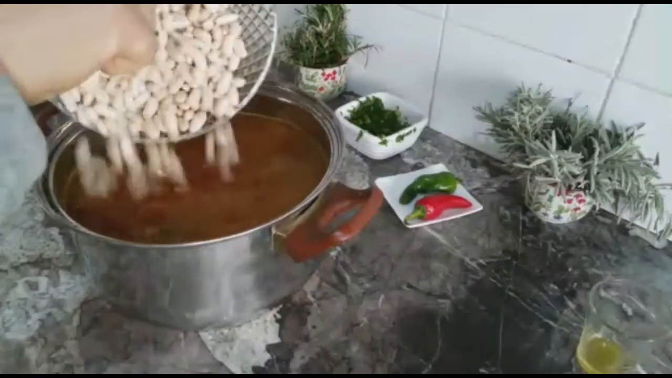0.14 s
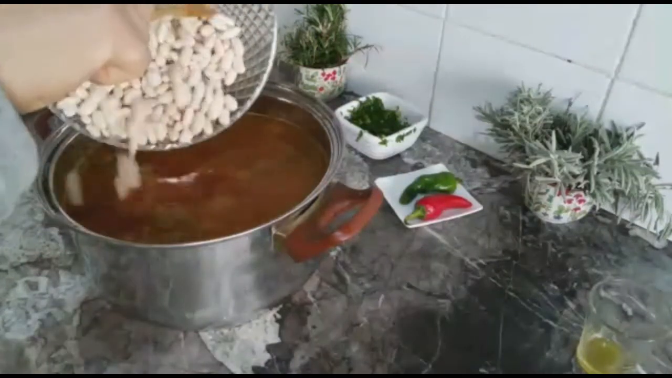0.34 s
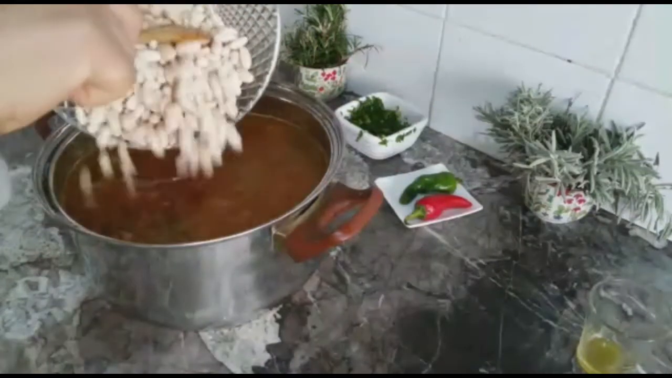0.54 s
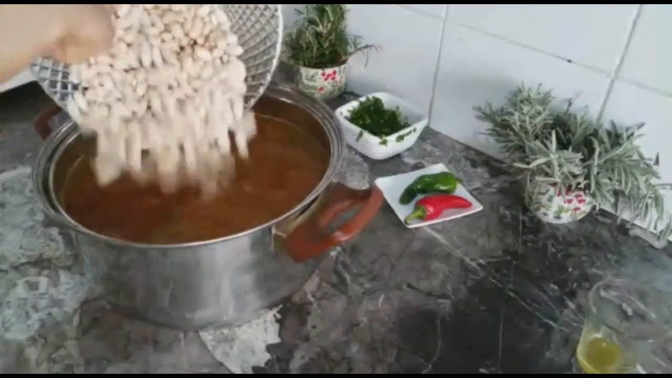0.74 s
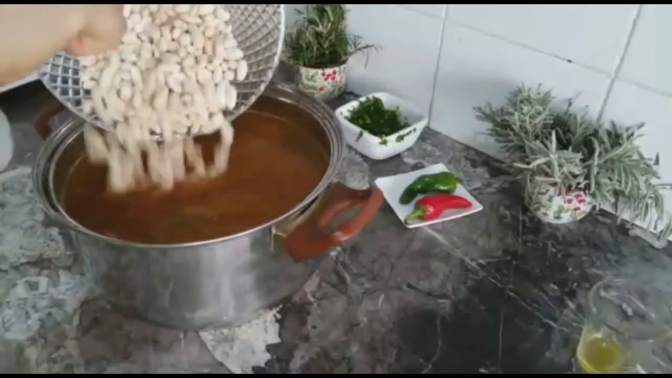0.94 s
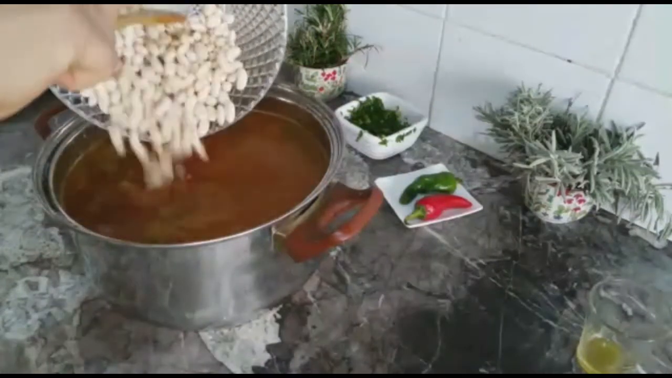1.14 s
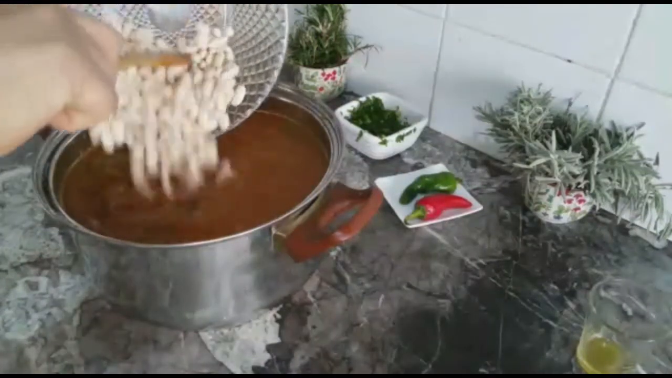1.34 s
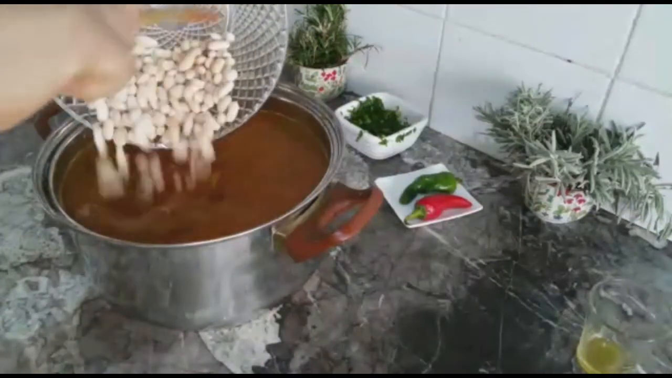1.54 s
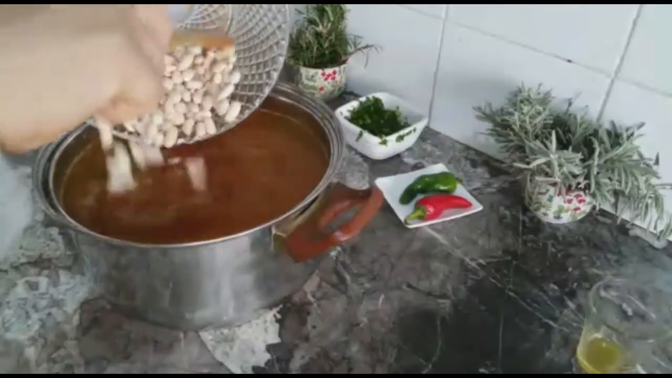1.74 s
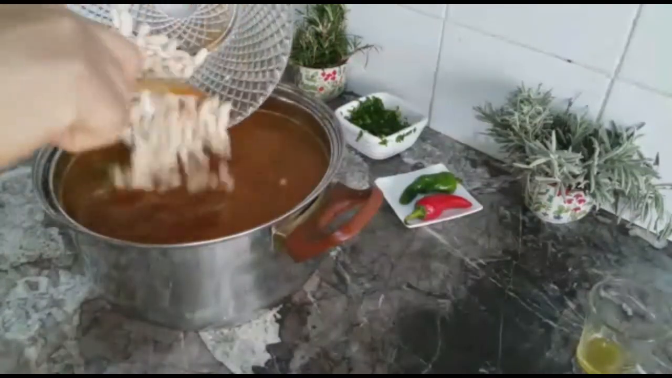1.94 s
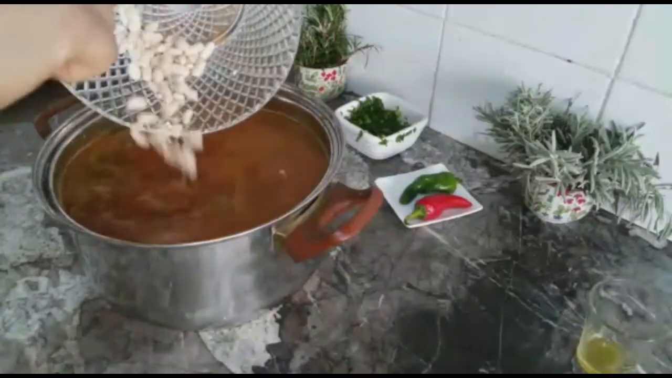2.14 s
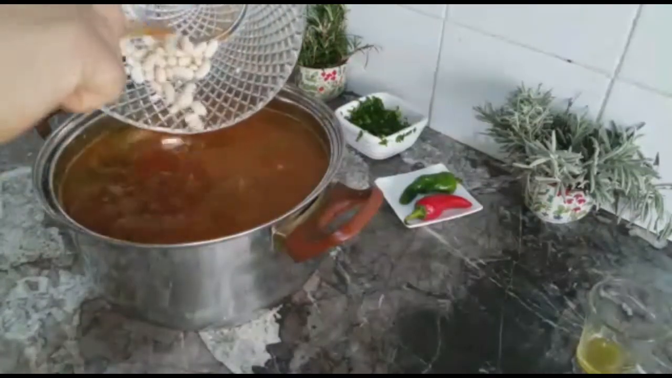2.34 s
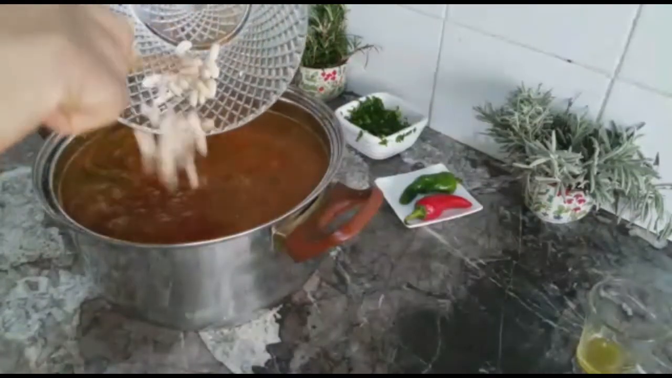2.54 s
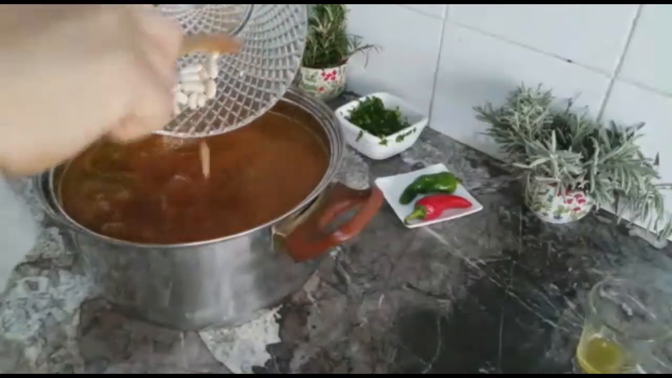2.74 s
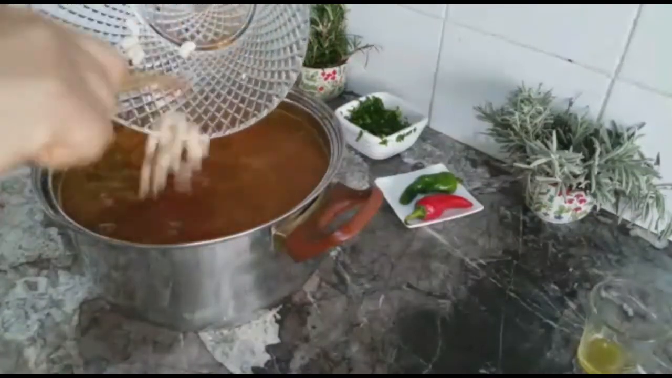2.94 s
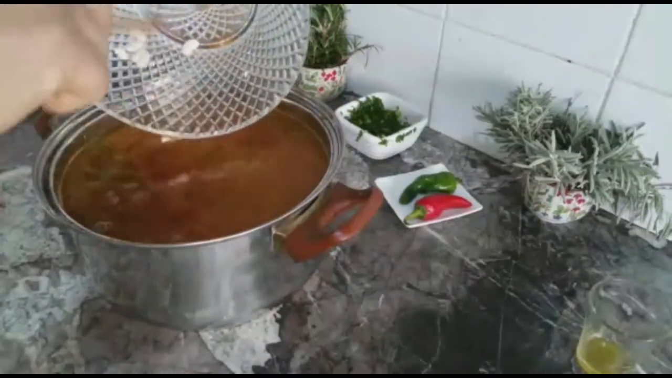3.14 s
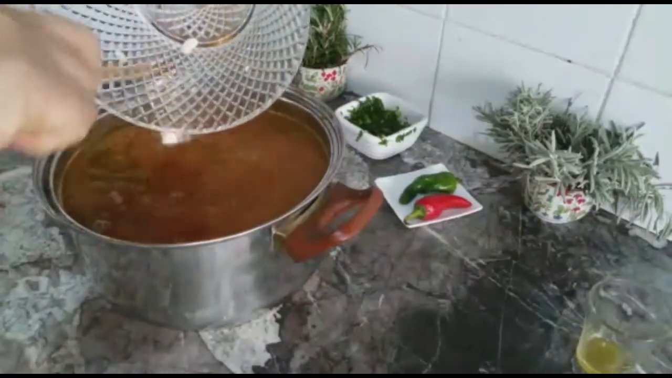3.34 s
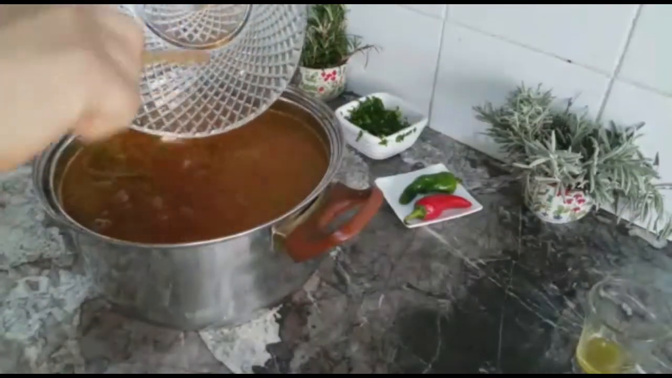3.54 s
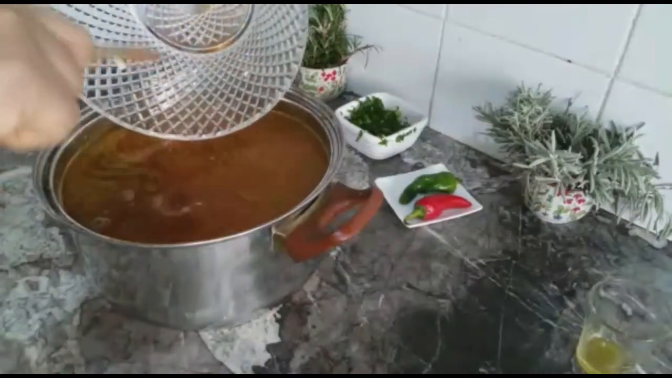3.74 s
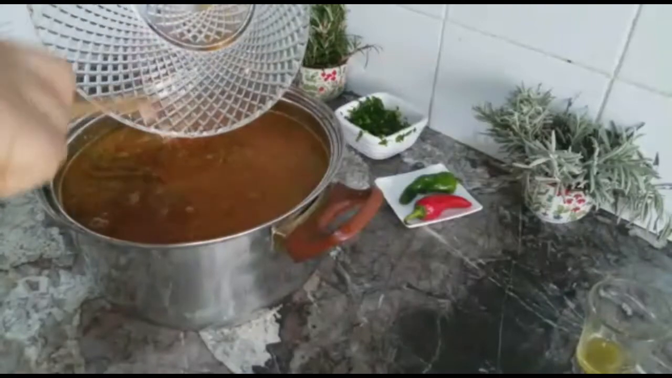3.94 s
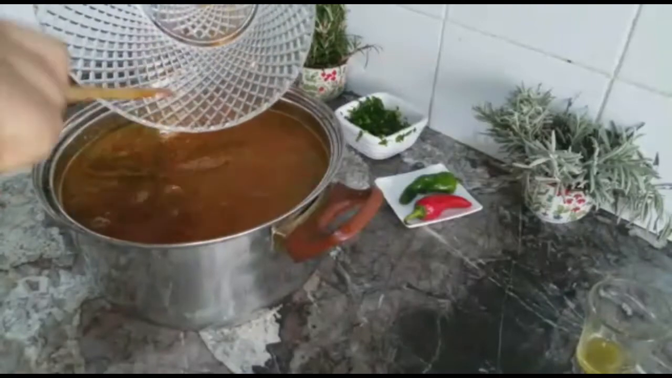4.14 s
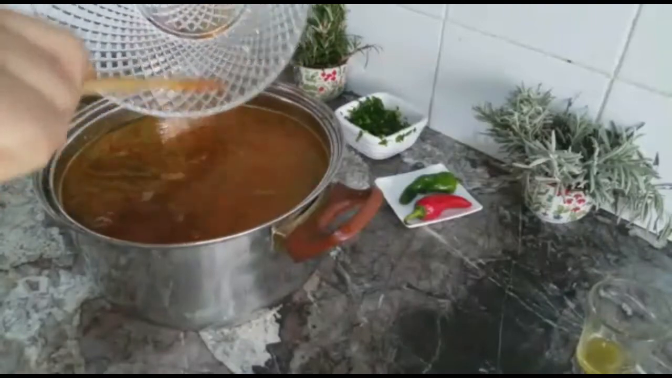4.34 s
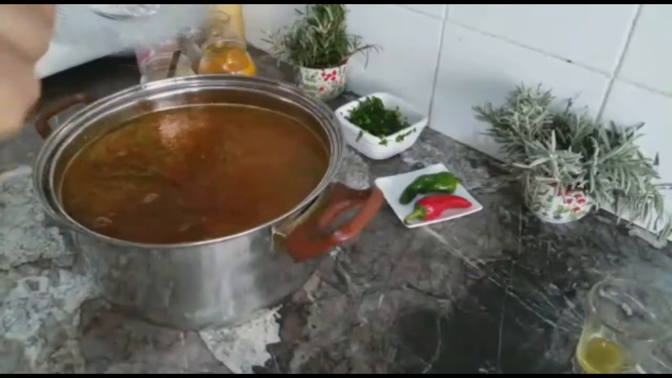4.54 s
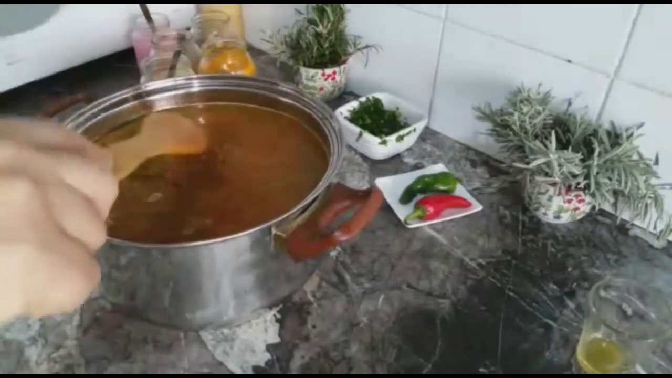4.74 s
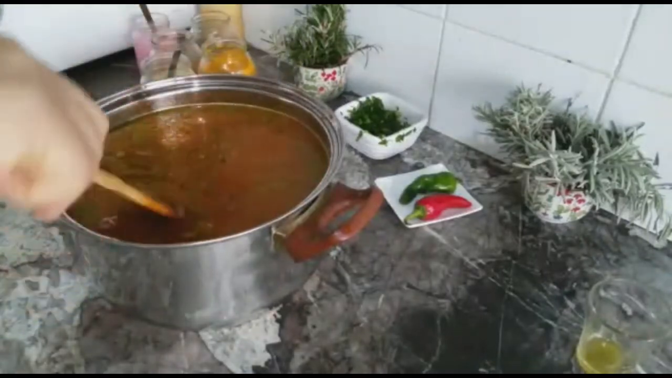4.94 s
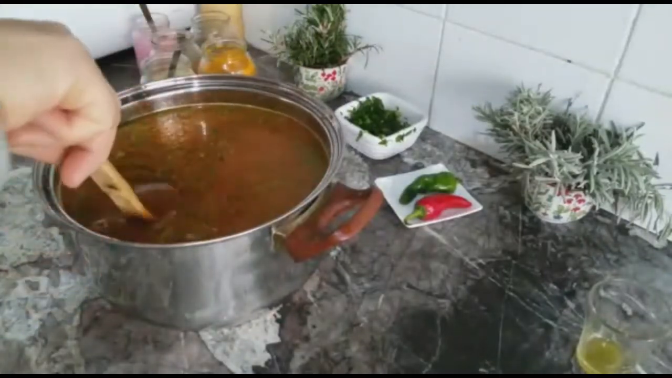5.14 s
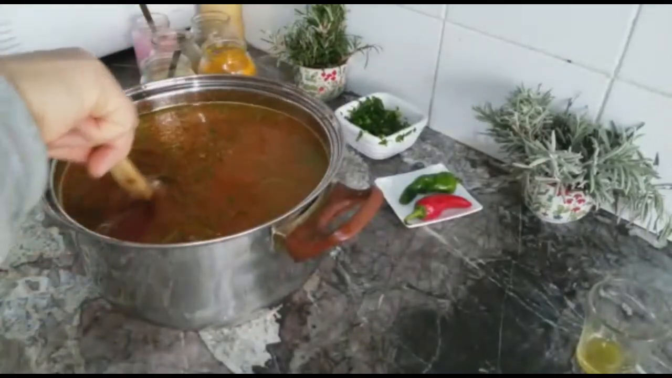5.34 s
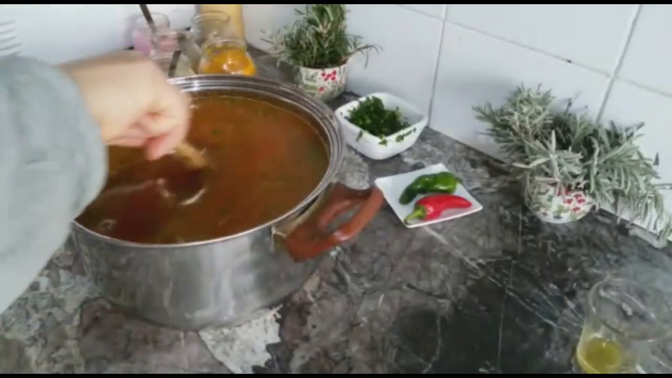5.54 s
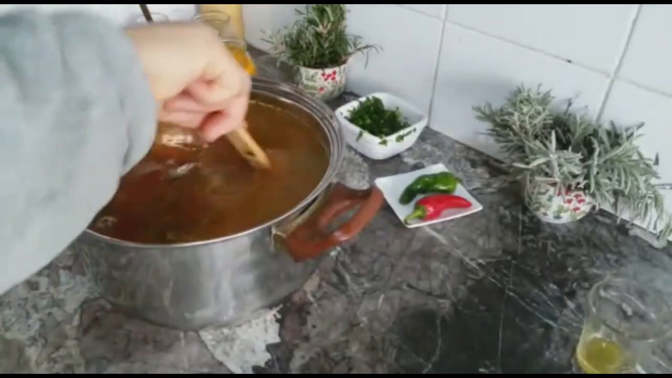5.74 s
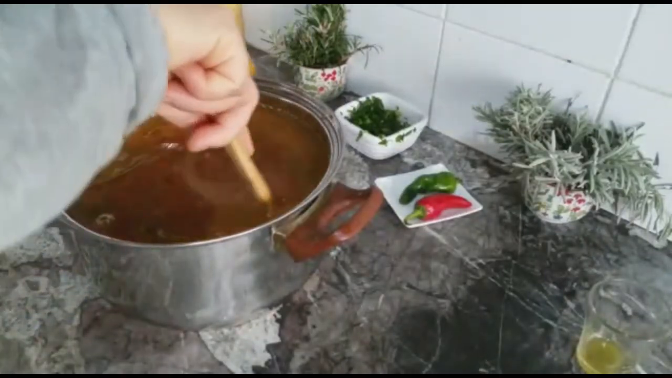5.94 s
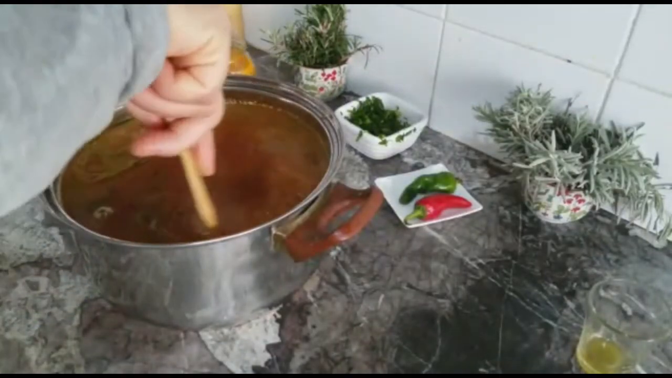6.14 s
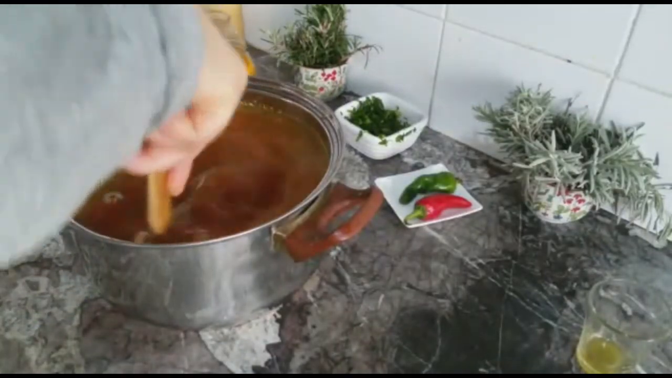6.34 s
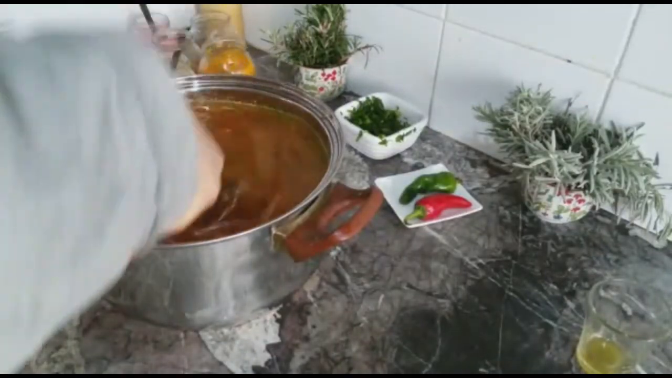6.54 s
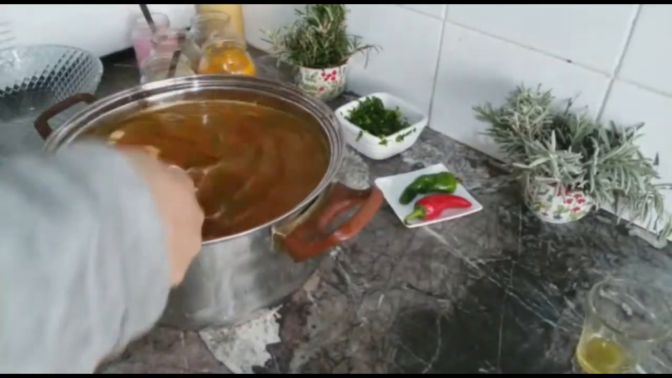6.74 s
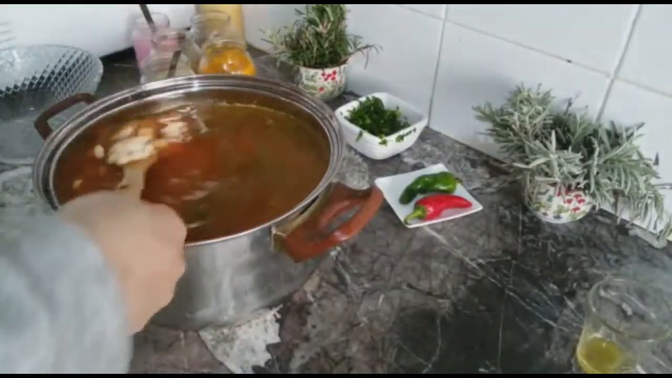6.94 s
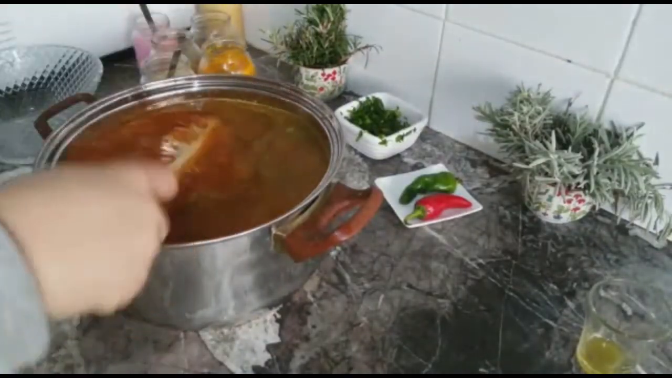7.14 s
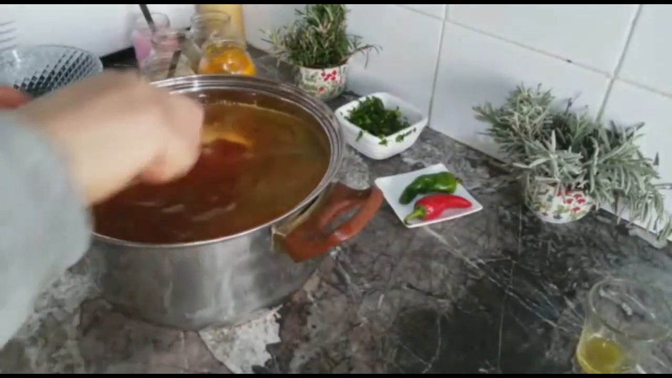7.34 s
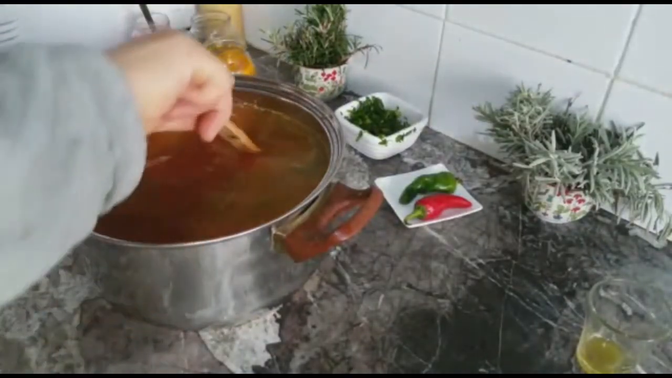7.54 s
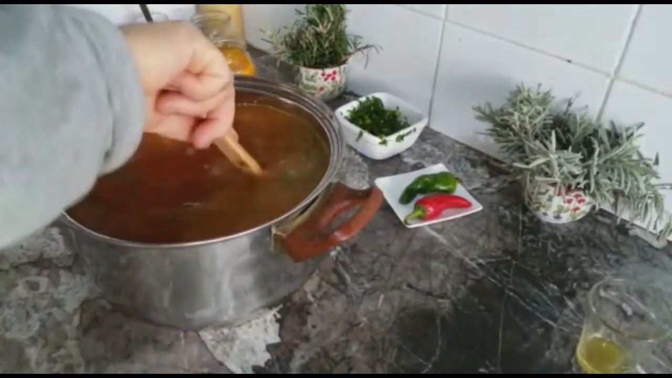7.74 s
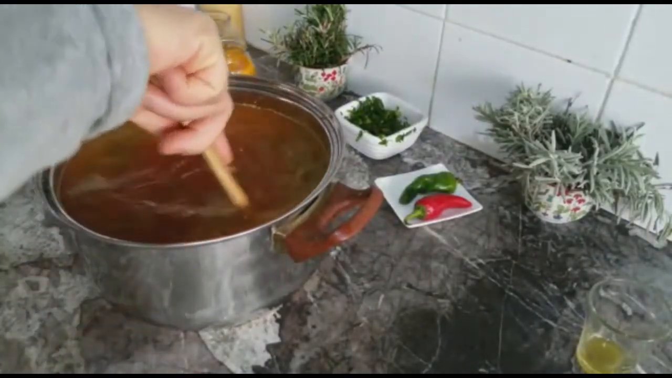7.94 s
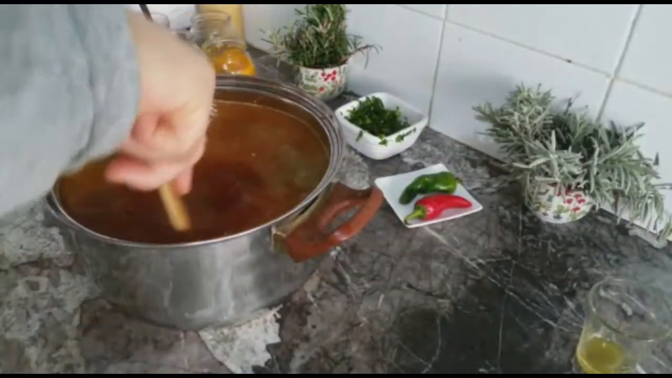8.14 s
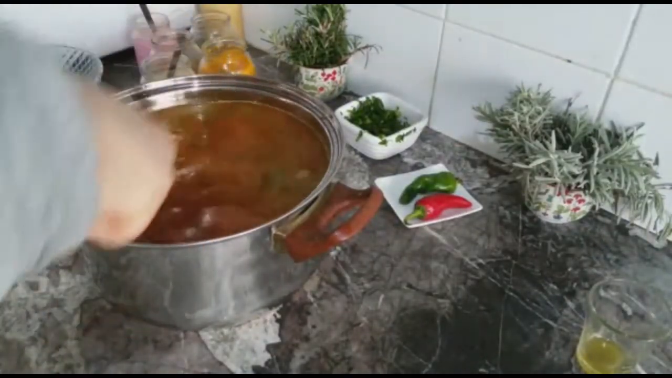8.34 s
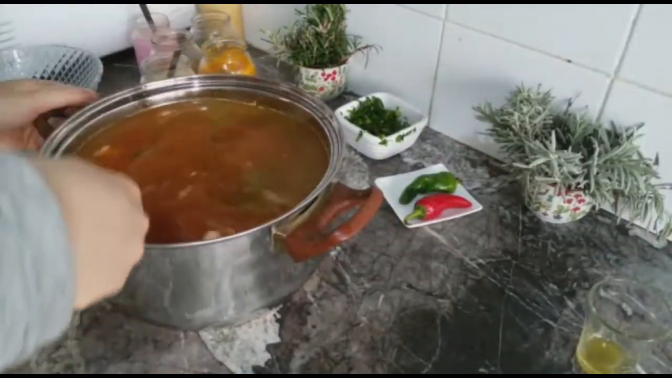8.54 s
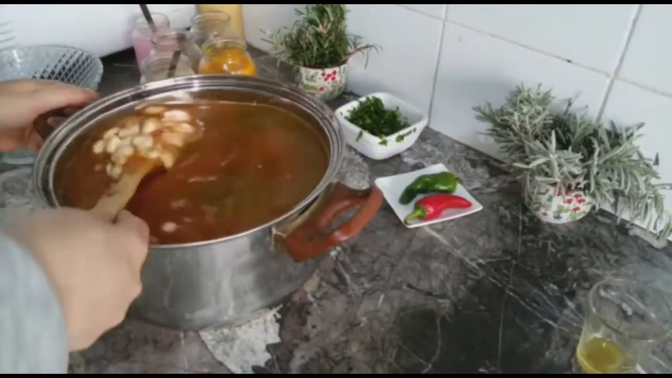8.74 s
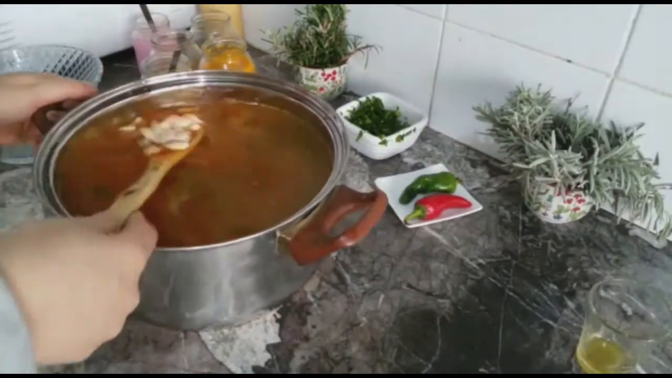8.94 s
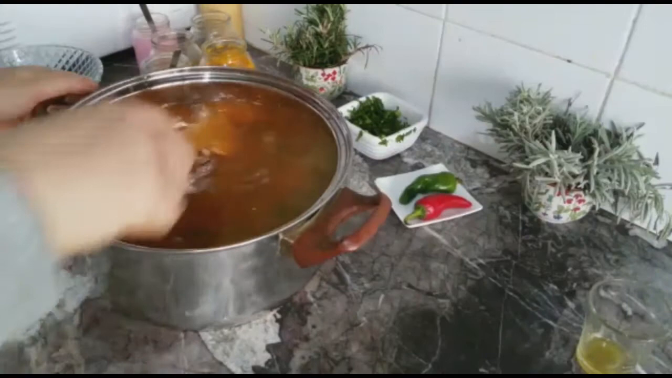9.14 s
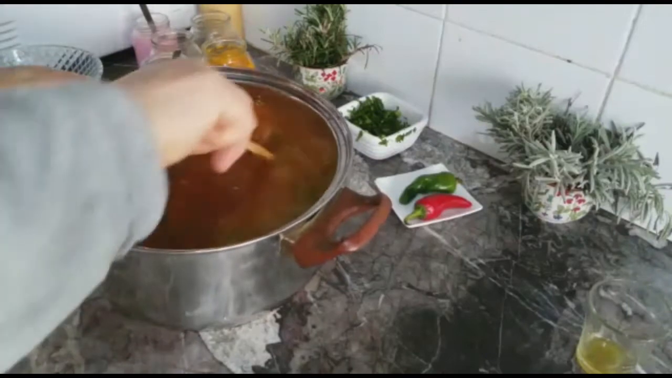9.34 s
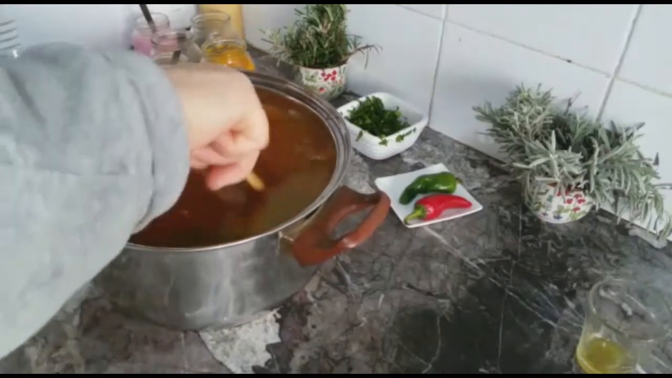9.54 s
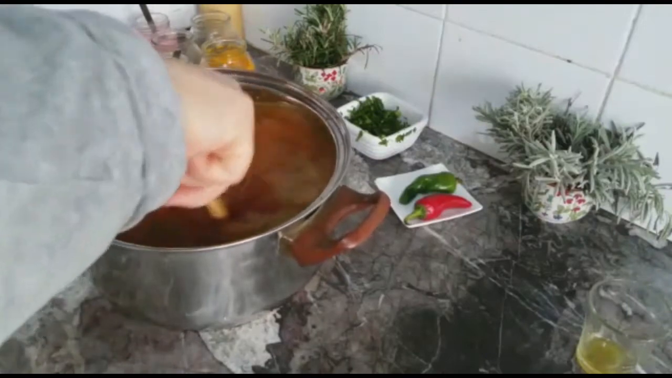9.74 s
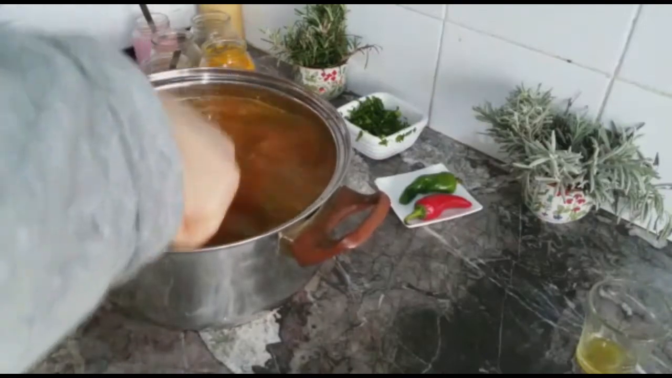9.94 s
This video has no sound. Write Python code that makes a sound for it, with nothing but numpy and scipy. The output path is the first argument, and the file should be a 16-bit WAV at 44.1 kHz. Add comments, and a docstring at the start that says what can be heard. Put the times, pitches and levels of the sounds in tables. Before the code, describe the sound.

In a small kitchen with hard walls, clumps of beans splash and plop into a nearby pot of broth for about three seconds. A wooden spoon pushes them out, tapping the glass bowl again and again until it is empty. After a brief lull comes gentle stirring, with wet swishes, low scraping and several knocks on the metal pot, loudest about six seconds in, over faint room noise.

```python
"""A small, hard, echoing kitchen. Beans slide from a glass bowl into a pot of broth, pushed by a wooden
spoon that taps the glass. The bowl is set down on a stone counter; the spoon stirs, scrapes and knocks
the pot. Glass and steel answer impact and friction with damped normal modes. The broth sounds through
brief splashes, fine spray and the resonance of the air pockets trapped in it."""
import sys
import numpy as np
from scipy import signal
from scipy.io import wavfile

SR = 44100
rng = np.random.default_rng(int(sys.argv[2]) if len(sys.argv) > 2 else 0)


def wav_out(sig):
    """Save sig, one row per channel (or a flat mono array), as 16-bit PCM at SR to the path in sys.argv[1]."""
    wavfile.write(sys.argv[1], SR, np.round(np.clip(np.atleast_2d(sig).T, -1, 1) * 32767).astype(np.int16))


N = 440118

# Spectrum of the room tone: f/Hz, relative spectral density/dB
ROOM_SPECTRUM = [(15, -33), (25, -4), (148, -1), (227, -3.5), (331, -4), (469, -11), (803, -10),
                 (996, -14.5), (12500, -21.5), (15500, -21.5)]
# Reverberation time of the kitchen: f/Hz, T60/s
REVERB_T60 = [(100, 0.86), (500, 0.4), (2000, 0.29), (6000, 0.4), (14000, 0.67)]
# Low rumble while the bowl is tipped: t/s, level/dB
TIPPING_RUMBLE = [(0, -64), (2.3, -59), (2.6, -65), (4.1, -64), (4.6, -83)]
# Modes of the full pot, damped by the broth: f/Hz, level/dB, T60/s
POT_MODES = [(150, -10, .06), (236, -8, .08), (312, -6, .1), (458, -7, .08), (535, -5, .09), (610, -4, .08),
             (755, -2, .06), (834, -4, .06), (928, -3, .06), (1240, -8, .06)]
# Dull knocks through pot and counter: t/s, level/dB, centre f/Hz, thump level/dB, relative rim ring/dB
POT_KNOCKS = [(5.4, -23, 620, -44, -26), (5.795, -57, 526, -52.5, -5), (6.213, -12.5, 1208, -46.5, -27),
              (6.238, -13, 1082, -60, -34), (6.528, -17, 1000, -53.5, -37), (7.566, -35.5, 325, -51.5, -4),
              (7.847, -42.5, 497, -52.5, -22), (8.211, -53, 526, -71.5, -27), (8.686, -54, 287, -66, -8)]
# Spoon strokes: fastest moment t/s, swell rate/(dB/s), drag on the steel/dB, swish of the broth/dB
SPOON_STROKES = [(5.428, 162, -48.5, -56.5), (5.828, 73, -52, -64), (6.074, 900, -51, -52),
                 (6.702, 95, -68, -61), (7.563, 898, -51, -49.5), (7.898, 91.5, -65, -65.5),
                 (8.249, 49, -58, -75.5), (8.549, 45, -54.5, -67.5), (8.95, 97, -81, -72.5),
                 (9.547, 99, -56.5, -65.5), (9.97, 73, -56, -81)]
# Modes of the glass bowl, damped by the hand: f/Hz, level/dB, T60/s
GLASS_MODES = [(732, -1, .26), (1555, -1, .19), (2541, -8, .16), (3702, -5, .13), (5070, -12, .12),
               (5160, -7, .018), (7350, -20, .11)]
# Clack modes for the flat of the spoon: f/Hz, level/dB, T60/s
FLAT_MODES = [(607, 4.7, 0.0067), (926, 0, 0.033), (1628, 0.28, 0.034)]
# Clack modes for the edge of the spoon: f/Hz, level/dB, T60/s
EDGE_MODES = [(1120, 2, 0.0081), (2330, -0.5, 0.011), (3320, -6, 0.009)]
# Blows on the bowl: t/s, level/dB, clack centre f/Hz, edge against flat/dB,
# relative glass ring/dB, ring centre f/Hz, relative ring above 4 kHz/dB
BOWL_TAPS = [(0.988, -15.5, 800, -10, -38, 1500, -30), (1.743, -8.5, 2750, 12.5, -23, 2950, 1),
             (1.788, -18.5, 870, -16.5, -40, 1200, -38), (1.844, -26.5, 1850, 2, -33, 2500, -27),
             (1.915, -33, 1723, -12, -22, 1560, 10), (2.289, -12, 1120, -15, -18, 1720, -5),
             (2.493, -43, 1600, -13, -2, 1510, -11), (2.669, -50, 1570, -10, 8, 1560, -14),
             (2.735, -34, 1280, 5, -7, 3000, 7), (2.774, -31.5, 1640, -10, -16.5, 1560, -20),
             (2.851, -20, 1690, -6, -10, 1750, -19), (3.131, -42, 1760, -4.5, -7, 1700, -14),
             (3.216, -13, 1346, -7, -19, 1000, -3), (3.282, -37, 1650, -9.5, -23, 1520, -30),
             (3.322, -21.5, 1830, 2.5, -10.5, 1850, -26), (3.502, -36.5, 1680, -17, -15, 1530, -4),
             (3.614, -23, 1070, -28, -14, 1120, -4.5), (3.656, -41, 1670, 3, -7, 1560, -14),
             (3.697, -18, 1800, 19, -29, 2000, -35), (3.886, -50.5, 1160, 16, -5, 1300, 3),
             (3.94, -37, 1280, -8.5, 7.5, 1130, -11), (4.004, -28, 3130, 18, -7, 3550, -28),
             (4.048, -39, 3800, 4, -6.5, 3240, -14), (4.12, -44.5, 4300, 5, -2, 3720, 4),
             (4.279, -19, 1400, 18, -6, 3000, -8.5), (4.874, -58, 606, 1, -21, 1500, -16.5),
             (6.212, -14, 1127, -5, -15.5, 1560, -1), (6.256, -14, 850, -14.5, -7.5, 1600, -25),
             (6.538, -17, 1090, -4, -8, 1650, -5)]
# Flow of beans, as the strength of their splashing: t/s, level/dB
BEAN_FLOW = [(0, -34.5), (.14, -39), (.35, -36), (.45, -50), (0.488, -38), (.67, -51.5), (0.82, -38),
             (.95, -33.5), (1.02, -39.5), (1.08, -35), (1.282, -41.5), (1.45, -40), (1.65, -35.5),
             (1.9, -42.5), (2.05, -53.5), (2.14, -36.5), (2.28, -40.5), (2.5, -59), (2.8, -47.5),
             (3.1, -79.5)]
# Weighting of the small bubbles by pitch, and so by size: f/Hz, level/dB
BUBBLE_SPECTRUM = [(710, -34), (1200, -2.5), (1580, 3.5), (2280, -3.5), (4900, 4), (7230, -12), (9000, -12),
                   (11700, -47)]
# Large air pockets closing behind the beans: t/s, level/dB, starting f/Hz
AIR_POCKETS = [(0.272, -31, 833), (0.466, -31, 986), (0.707, -31, 706), (0.805, -21, 882),
               (0.819, -22.5, 721), (0.844, -24.5, 892), (0.901, -23, 928), (0.943, -21.5, 893),
               (1.057, -29, 982), (1.244, -27.5, 907), (1.549, -30.5, 856), (1.583, -30.5, 870),
               (1.654, -28.5, 956), (1.722, -27.5, 960), (2.074, -30, 900), (8.537, -51, 476),
               (9.49, -52, 922)]
# Clumps and drops hitting the broth: t/s, level/dB, centre f/Hz, relative spray/dB
BROTH_IMPACTS = [(0.0444, -33, 4900, -7), (0.0657, -27, 3550, -14), (0.183, -24.5, 3380, -10),
                 (0.2227, -25, 5000, -20), (0.3411, -16.5, 4450, -9.5), (0.38, -24, 4640, -13),
                 (0.5224, -28, 4400, -12.5), (0.5583, -26, 4800, -4), (0.7295, -28.5, 2940, -10),
                 (0.8102, -20.5, 4940, -6), (0.919, -21, 4200, -9.5), (0.9444, -23, 4930, -34),
                 (1.034, -18.5, 5300, -18), (1.0622, -20, 3600, -10), (1.1203, -18.5, 2040, -30),
                 (1.203, -20, 3150, -28.5), (1.3892, -22, 4700, -31), (1.4866, -22, 4630, -30),
                 (1.552, -19, 4350, -35), (1.697, -23.5, 4200, -25.5), (1.7432, -14, 4430, -18),
                 (1.9375, -23.5, 4630, -14), (2.0918, -30, 4700, -5.5), (2.1345, -23, 4570, -14),
                 (2.1914, -20, 4700, -28), (2.323, -24.5, 4670, -25), (2.602, -29.5, 4340, -35),
                 (2.6415, -31.5, 5050, -19), (2.7432, -30.5, 4800, -19), (2.7782, -30.5, 4400, -11),
                 (2.9317, -30.5, 4700, -12), (3.1445, -31, 4520, -11.5), (3.672, -34, 4530, -28),
                 (4.0466, -29, 4320, -40), (5.8037, -48, 2700, -13), (6.767, -49, 4730, -13),
                 (7.252, -49, 4780, -19.5), (7.567, -39, 4140, -34), (8.2794, -51.5, 3660, -29),
                 (8.6817, -47, 3790, -15), (9.423, -51, 2730, -26.5), (9.5815, -47, 3220, -21.5)]

ROOM_DB, REVERB_DB, CUTOFF_HZ = -66.5, -5.5, 15950
RIM_HZ, RIM_T60_S = 4310, .12   # bare steel above the broth
DRAG_FADE_DB_PER_S, SWISH_FADE_DB_PER_S = 62.5, 98.5
BEANS_ON_POT_DB, SLOSH_DB = -13, -14   # relative to the splashing and to the spoon's drag
RING_FALL_DB_PER_OCTAVE = 11
FLOW_MID_DB, PLOPPING_DB, SPATTER_DB = -38, -49.5, -52   # levels at middling flow
SPATTER_DB_PER_FLOW_DB = 3.1


def from_db(db):
    """Amplitude ratio: a factor of ten for every 20 dB."""
    return 10 ** (np.asarray(db) / 20)


def unit_rms(x):
    """Normalisation to a mean square of one."""
    return x / np.sqrt(np.mean(x ** 2) + 1e-20)


def level_curve(rows):
    """Linear interpolation of level/dB at every sample, silent outside the table's span."""
    return np.interp(np.arange(N) / SR, *np.transpose(rows), left=-120, right=-120)


def at_hz(rows, hz):
    """Interpolation on a logarithmic frequency axis."""
    frequencies, values = np.transpose(rows)
    return np.interp(np.log(hz), np.log(frequencies), values)


def band(x, low_hz, high_hz):
    """Band-pass filtering with a maximally flat passband."""
    sos = signal.butter(2, [low_hz, min(high_hz, SR / 2.2)], "band", fs=SR, output="sos")
    return signal.sosfilt(sos, x)


def coloured(noises, gain_at):
    """Spectral shaping: half-octave bands, taken from two noises in turn, are weighted and summed."""
    edges = 25 * 2 ** np.arange(0, 9.6, .5)
    return sum(band(noises[k % 2], low, high) * gain_at(np.sqrt(low * high))
               for k, (low, high) in enumerate(zip(edges, edges[1:])))


def resonator(drive, hz, t60):
    """Damped harmonic oscillator: a unit impulse starts a decaying sine of about unit height."""
    decay, omega = from_db(-60 / (t60 * SR)), 2 * np.pi * hz / SR
    return signal.lfilter([0, np.sin(omega)], [1, -2 * decay * np.cos(omega), decay ** 2], drive + 1e-18)


def impulses(per_s, spread_db):
    """Shot noise: independent impulses of uneven size and sign."""
    sizes = from_db(spread_db * np.minimum(rng.exponential(1, N), 4)) * rng.choice([-1, 1], N)
    return sizes * (rng.random(N) < per_s / SR)


def bursts(rows, t60, octaves, rise_s):
    """A brief contact has a broad spectrum: each row (t/s, peak level/dB, f/Hz) is decaying noise."""
    out, t = np.zeros(N), np.arange(SR // 10) / SR
    envelope = from_db(-60 * t / t60) * np.clip(t / rise_s, 0, 1)
    for start_s, db, hz, *_ in rows:
        burst = band(rng.standard_normal(len(t)) * envelope, hz / 2 ** octaves, hz * 2 ** octaves)
        burst = band(burst, hz / 2.4, hz * 6)   # steeper skirts
        at = round(start_s * SR)
        out[at:at + len(t)] += from_db(db) * burst / np.abs(burst).max()
    return out


def struck(modes, times, strength_db, spread_db, rubbing=0):
    """Modal superposition: blows drive each mode by strength_db(f), with scatter; rubbing drives all."""
    scatter_db = spread_db * rng.standard_normal((len(times), len(modes)))
    out = 0
    for k, (hz, level_db, t60) in enumerate(modes):
        drive = np.zeros(N) + rubbing / np.sqrt(t60 * SR)
        drive[np.round(times * SR).astype(int)] += from_db(strength_db(hz) + scatter_db[:, k])
        out = out + from_db(level_db) * resonator(drive, hz, t60) * (-1) ** k
    return band(band(out, 49, 6300), 40, 6400)   # finite contact time dulls the treble


def room_tone():
    """Stationary noise, strongest in the bass, forms the background."""
    noise = coloured(rng.standard_normal((2, N)), lambda hz: from_db(at_hz(ROOM_SPECTRUM, hz)))
    return from_db(ROOM_DB) * unit_rms(noise)


def reverberation(direct):
    """Diffuse field: reflections build up, then decay exponentially at each band's own rate."""
    t = np.arange(SR // 2) / SR
    tail = coloured(rng.standard_normal((2, len(t))), lambda hz: from_db(-60 * t / at_hz(REVERB_T60, hz)))
    tail *= np.clip((t - .005) / .02, 0, 1)
    return from_db(REVERB_DB) * signal.fftconvolve(direct, tail / np.sqrt(np.sum(tail ** 2)))[:N]


def tipping_rumble():
    """Amplitude-modulated bass noise is heard while the bowl is tipped."""
    return unit_rms(band(rng.standard_normal(N), 55, 190)) * from_db(level_curve(TIPPING_RUMBLE))


def plops(rows, rise_per_s, t60, wobble):
    """Bubble resonance: the pitch climbs as an air pocket nears the surface, and wavers as that heaves."""
    out, t = np.zeros(N + SR), np.arange(SR // 8) / SR
    for start_s, db, hz in rows:
        heave = np.interp(t, np.linspace(0, t[-1], num=16), rng.standard_normal(16))
        envelope = np.clip(t / 0.0016, 0, 1) * from_db(db - 60 * t / t60 + 33 * wobble * heave)
        pitch_hz = hz * (1 + rise_per_s * t + wobble * heave[::-1])
        at = round(start_s * SR)
        out[at:at + len(t)] += envelope * np.sin(2 * np.pi * np.cumsum(pitch_hz) / SR)
    return out[:N]


def gurgle(level_db, start_s, end_s, low_hz, count):
    """Incoherent sum of plops at random times, spread over about an octave."""
    when, strength, pitch = rng.random((count, 3)).T
    rows = zip(start_s + when * (end_s - start_s), 12 * strength, low_hz * 2.1 ** pitch)
    return unit_rms(plops(rows, rise_per_s=6.9, t60=0.043, wobble=0.042)) * from_db(level_db)


def stirring_level(peaks_db, fade_db_per_s):
    """Exponential growth and decay about each stroke's fastest moment; the loudest sets level/dB."""
    t = np.arange(N) / SR
    return np.max([db - np.maximum(swell * (peak_s - t), fade_db_per_s * (t - peak_s))
                   for (peak_s, swell, *_), db in zip(SPOON_STROKES, peaks_db)], axis=0)


def pot(drag_db, flow_db):
    """Forced vibration: knocks ring the pot and thump the stove; spoon and beans rub; broth sloshes."""
    times, db, centre_hz, thump_db, rim_db = np.transpose(POT_KNOCKS)
    friction = unit_rms(impulses(per_s=1700, spread_db=4.5))
    friction *= from_db(drag_db) + from_db(flow_db + BEANS_ON_POT_DB)
    wall = struck(POT_MODES, times, lambda hz: db - 4.5 - 4 * abs(np.log2(hz / centre_hz)),
                  spread_db=7.0, rubbing=from_db(-6.5) * friction)
    thumps = [(at, level_db, 98) for at, level_db in zip(times, thump_db)]
    stove = from_db(5.5) * bursts(thumps, t60=0.082, octaves=0.38, rise_s=0.0073)
    rim = struck([(RIM_HZ, 0, RIM_T60_S)], times, lambda hz: db + rim_db, spread_db=1)
    thuds = bursts(POT_KNOCKS, t60=0.13, octaves=0.92, rise_s=0.0038)
    scrape = from_db(4.5) * band(friction, 73, 1300)
    slosh = gurgle(drag_db + SLOSH_DB, SPOON_STROKES[0][0], N / SR, low_hz=317.0, count=200)
    return wall + rim + stove + thuds + scrape + slosh


def bowl(flow_db):
    """Impact excitation: taps clack and ring the glass; sliding beans tick mainly on its high modes."""
    times, db, clack_hz, edge_db, ring_db, ring_hz, top_db = np.transpose(BOWL_TAPS)
    ticks = unit_rms(band(impulses(per_s=98, spread_db=7.5), 2700, 9000)) * from_db(flow_db + 4)
    clack = 0
    for modes, cut_db in ((FLAT_MODES, edge_db), (EDGE_MODES, -edge_db)):
        blow_db = db + 0.87 - np.maximum(cut_db, 0)
        clack += struck(modes, times, lambda hz: blow_db - 6 * abs(np.log2(hz / clack_hz)), spread_db=3)

    def glass_drive_db(hz):
        """Excitation falls away from the ring's centre; the top modes have their own level."""
        if hz > 4000:
            return db + top_db
        return db + ring_db - RING_FALL_DB_PER_OCTAVE * abs(np.log2(hz / ring_hz))

    glass = struck(GLASS_MODES, times, glass_drive_db, spread_db=1, rubbing=ticks)
    contact = from_db(-2.5) * bursts(BOWL_TAPS, t60=0.05, octaves=0.9, rise_s=0.00065)
    return signal.sosfilt(signal.butter(4, 460, "high", fs=SR, output="sos"), clack + glass + contact)


def spatter(level_db):
    """Modulated noise: clumps of fine droplets hiss and decay independently in two treble bands."""
    out, decay = 0, from_db(-60 / (0.045 * SR))
    for low_hz in (6000, 9000):
        clumps = signal.lfilter([1], [1, -decay], np.abs(impulses(per_s=60, spread_db=3.5)) + 1e-18)
        out = out + band(rng.standard_normal(N) * clumps, low_hz, 1.65 * low_hz)
    return unit_rms(out) * from_db(level_db)


def bubbles(level_db, per_s, cycles, spread_db):
    """Constant-Q resonance: small bubbles of scattered pitch each fall 60 dB in the given cycles."""
    births, pitches = impulses(per_s, spread_db), np.geomspace(1250, 8500, num=18)
    pitch_index = rng.integers(0, len(pitches), N)
    out = 0
    for k, hz in enumerate(pitches):
        weight = from_db(at_hz(BUBBLE_SPECTRUM, hz)) * np.sqrt(hz)
        out = out + weight * resonator(births * (pitch_index == k), hz, cycles / hz)
    return unit_rms(out) * from_db(level_db)


def broth(flow_db, swish_db):
    """Impact and air entrainment: beans splash, spray, plop and bubble; stirring makes a dense fizz."""
    swing_db = flow_db - FLOW_MID_DB
    snaps = from_db(-5) * bursts(BROTH_IMPACTS, t60=0.008, octaves=0.5, rise_s=0.0004)
    spray_rows = [(at, db + spray_db, 9000) for at, db, _, spray_db in BROTH_IMPACTS]
    spray = bursts(spray_rows, t60=0.07, octaves=0.7, rise_s=0.006)
    swish = bubbles(swish_db, per_s=9000, cycles=12, spread_db=1.5)
    large_plops = plops(AIR_POCKETS, rise_per_s=2.0, t60=0.13, wobble=0.049)
    small_plops = gurgle(PLOPPING_DB + swing_db, 0, BEAN_FLOW[-1][0], low_hz=485.5, count=330)
    droplets = spatter(SPATTER_DB + SPATTER_DB_PER_FLOW_DB * swing_db)
    bubbling = bubbles(flow_db, per_s=3500, cycles=31, spread_db=3.5)
    splashes = bursts(BROTH_IMPACTS, t60=0.075, octaves=0.34, rise_s=0.001)
    return snaps + spray + swish + large_plops + small_plops + droplets + bubbling + splashes


def scene():
    """Superposition of direct sound, background and reverberation in one channel."""
    flow_db = level_curve(BEAN_FLOW)
    *_, drag_peaks_db, swish_peaks_db = np.transpose(SPOON_STROKES)
    drag_db = stirring_level(drag_peaks_db, DRAG_FADE_DB_PER_S)
    swish_db = stirring_level(swish_peaks_db, SWISH_FADE_DB_PER_S)
    direct = bowl(flow_db) + broth(flow_db, swish_db) + pot(drag_db, flow_db)
    direct = band(direct, 70, 20000)   # deep bass below 70 Hz is removed
    return (direct + room_tone() + tipping_rumble() + reverberation(direct))[None]


def record(dry):
    """Band limiting: a steep low-pass removes the highest treble."""
    return signal.sosfilt(signal.cheby2(12, 70, CUTOFF_HZ, fs=SR, output="sos"), dry)


dry = scene()
out = record(dry)
wav_out(out)
```